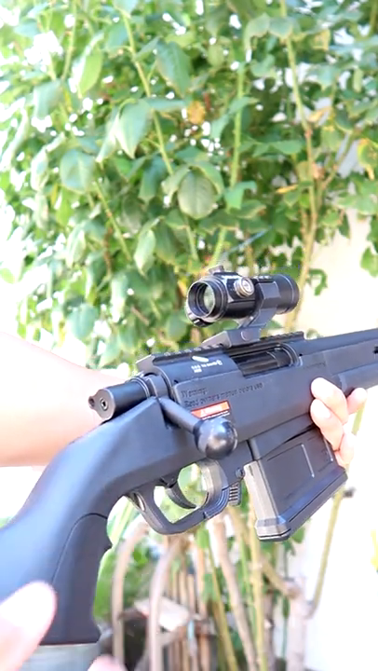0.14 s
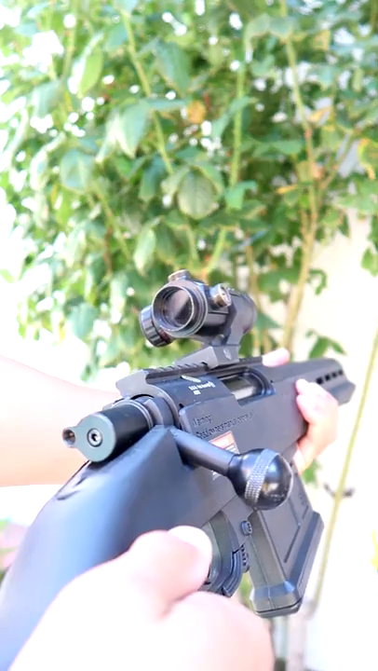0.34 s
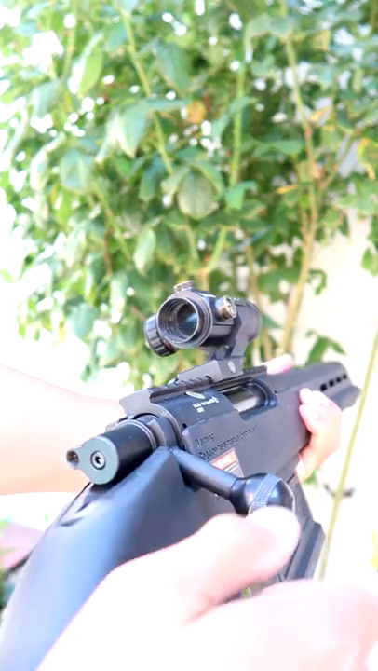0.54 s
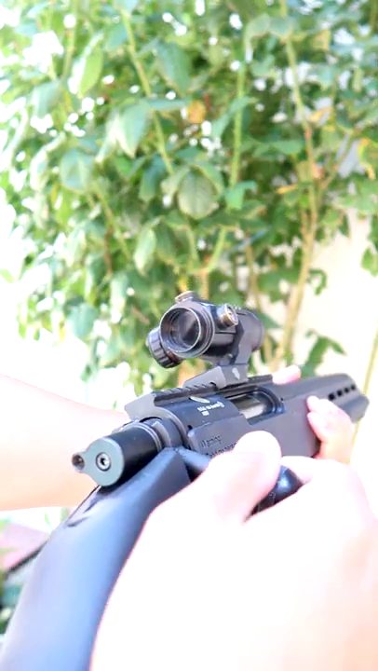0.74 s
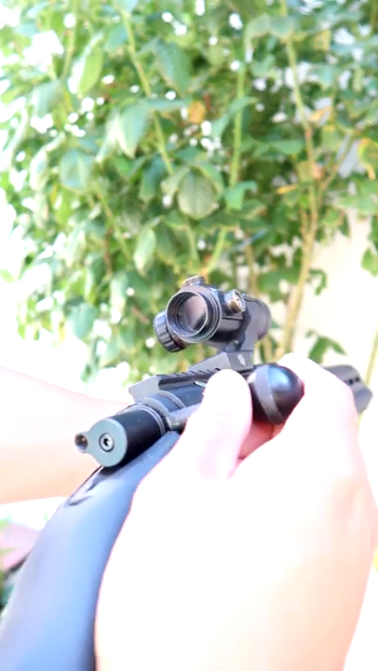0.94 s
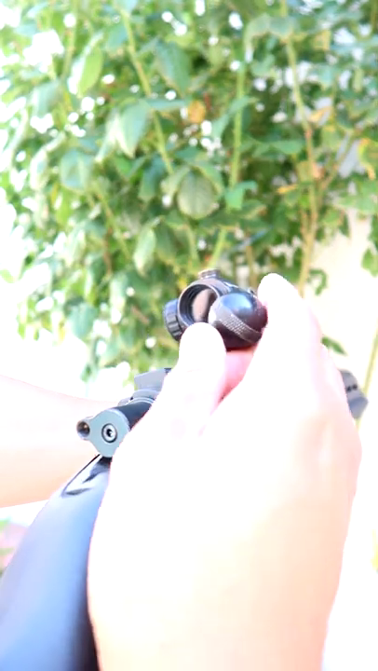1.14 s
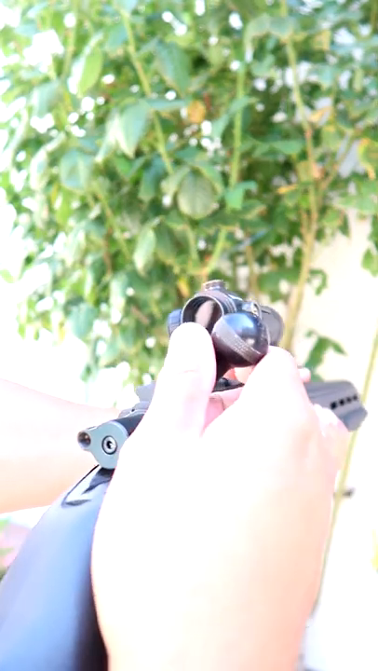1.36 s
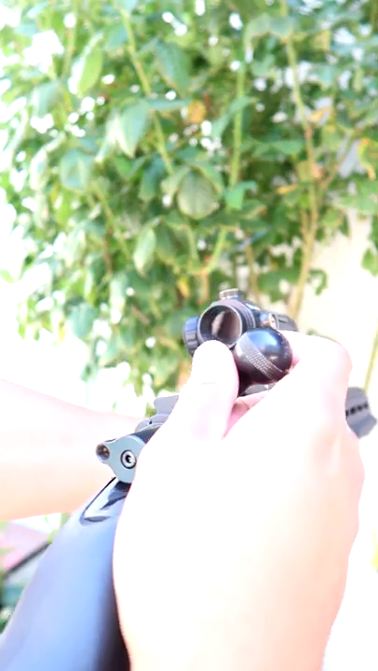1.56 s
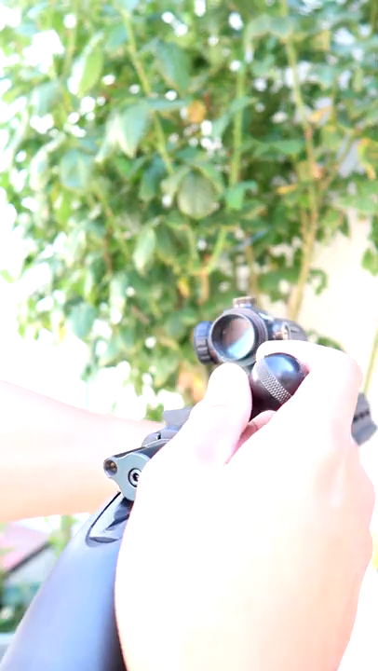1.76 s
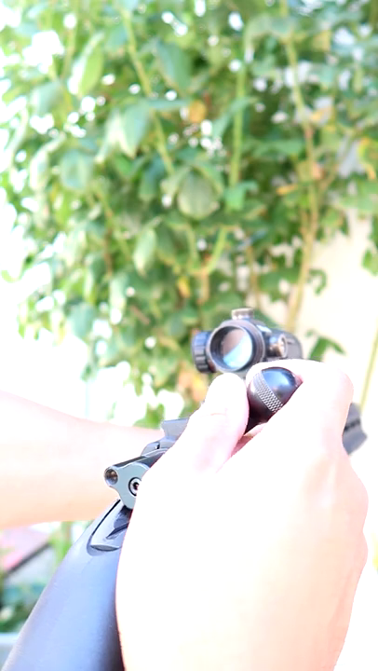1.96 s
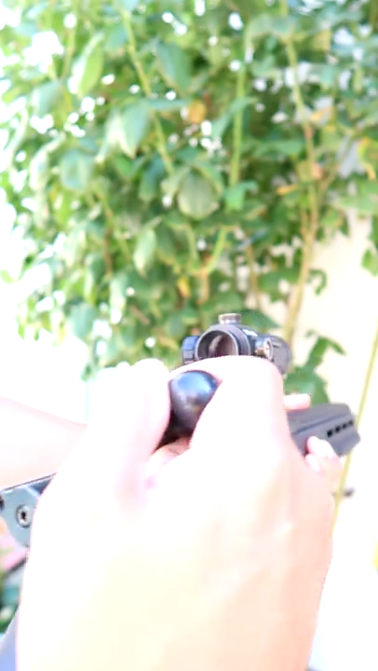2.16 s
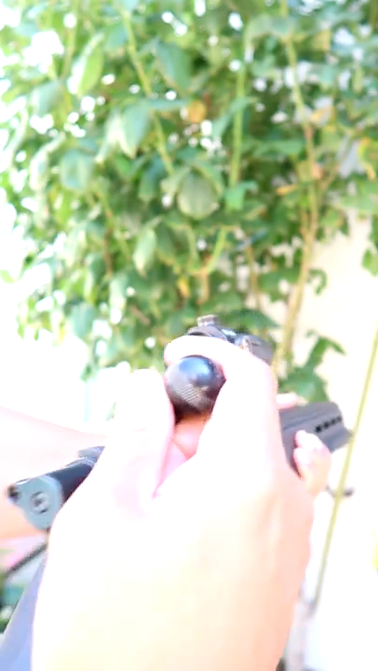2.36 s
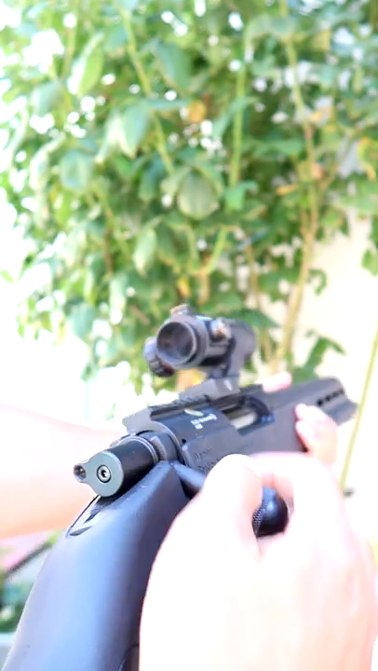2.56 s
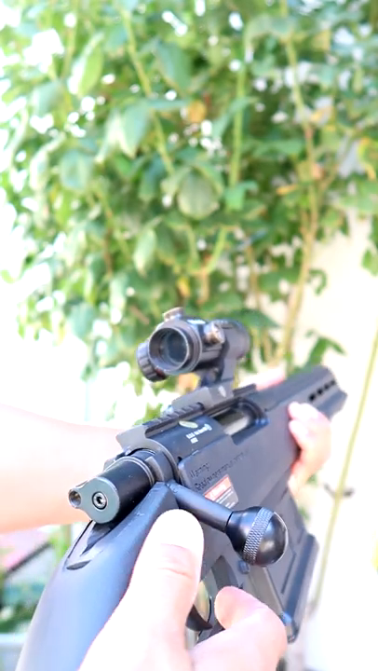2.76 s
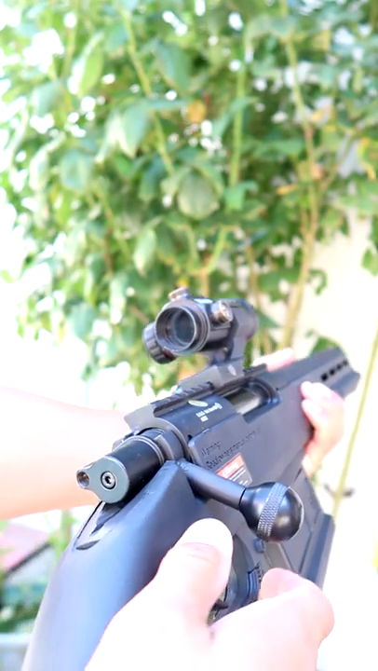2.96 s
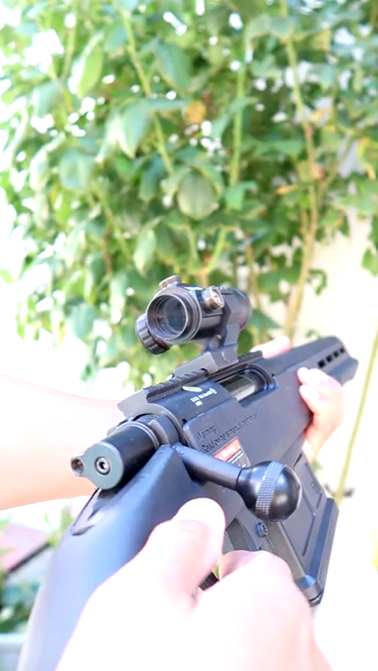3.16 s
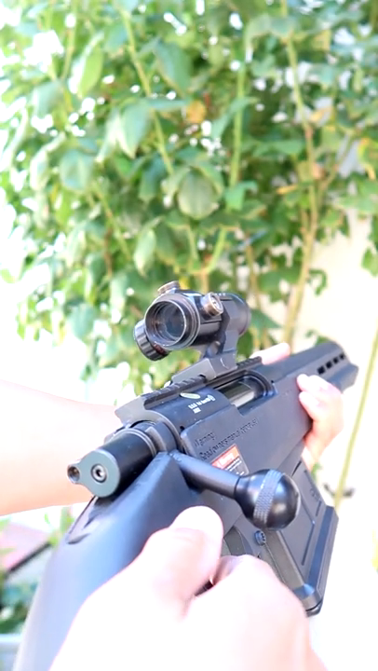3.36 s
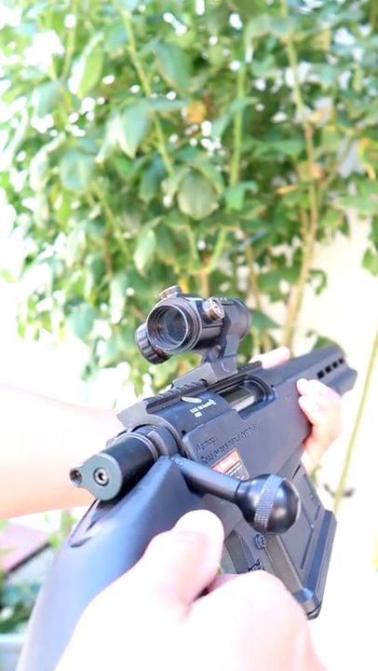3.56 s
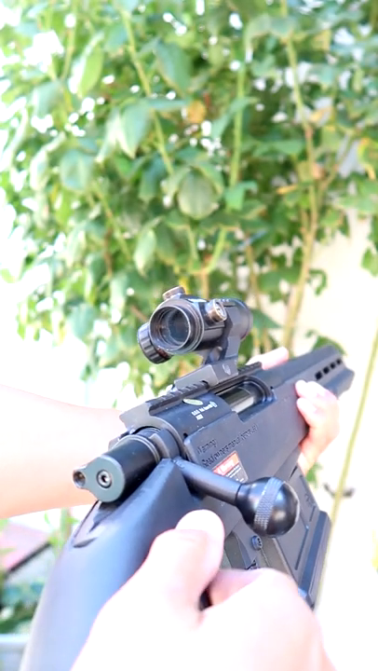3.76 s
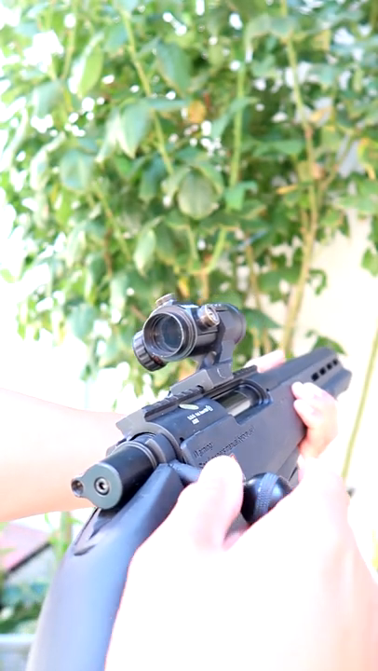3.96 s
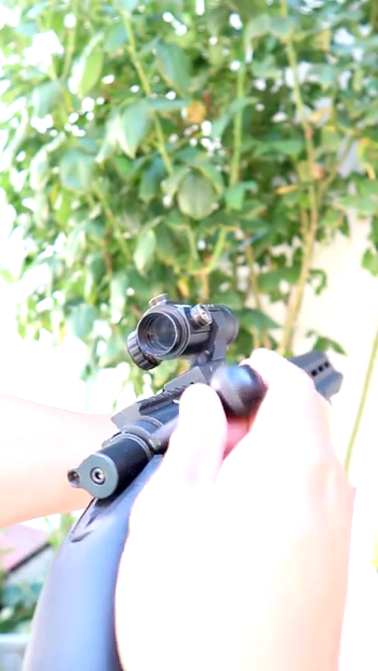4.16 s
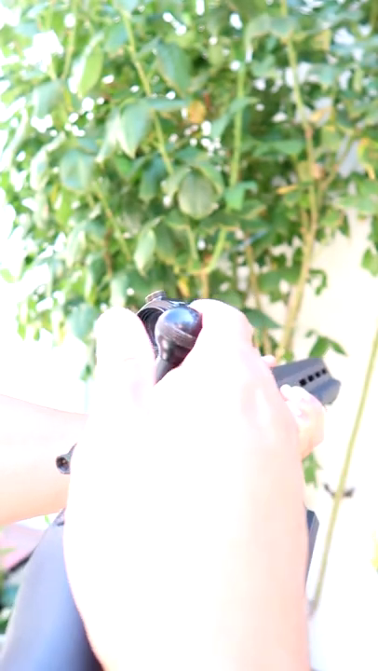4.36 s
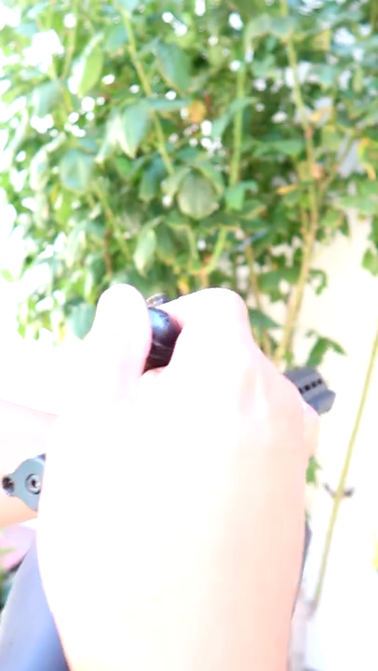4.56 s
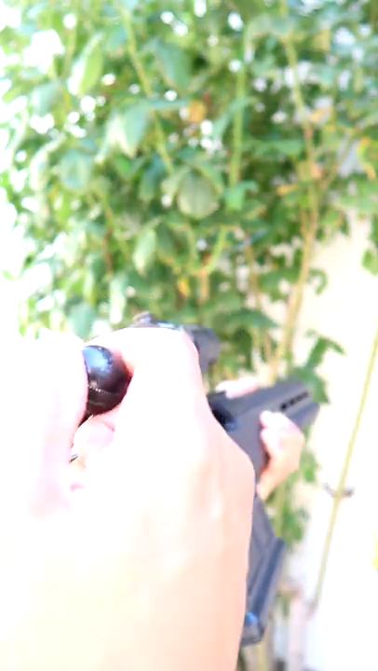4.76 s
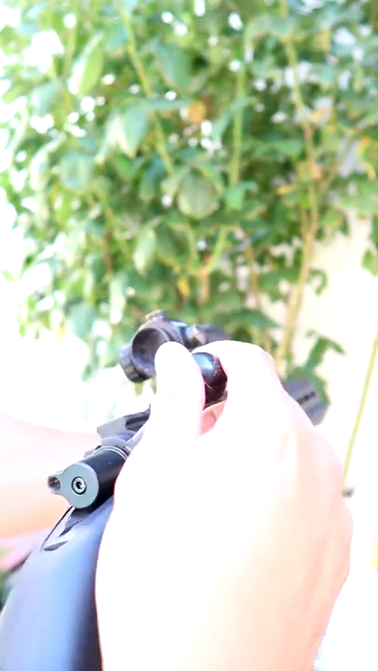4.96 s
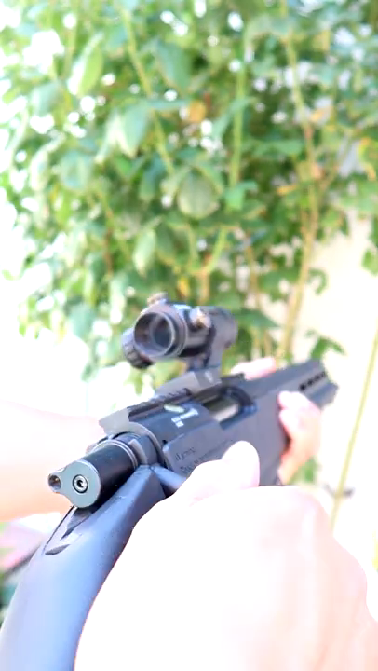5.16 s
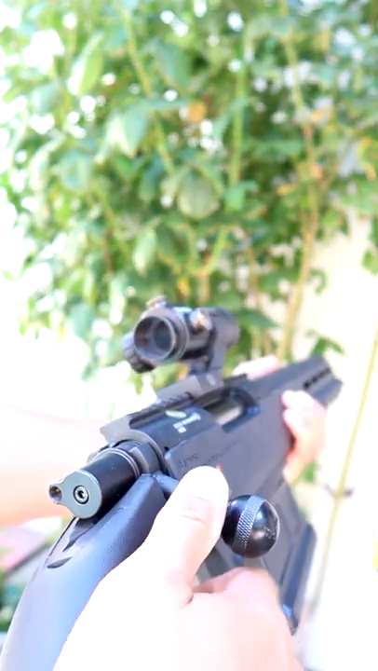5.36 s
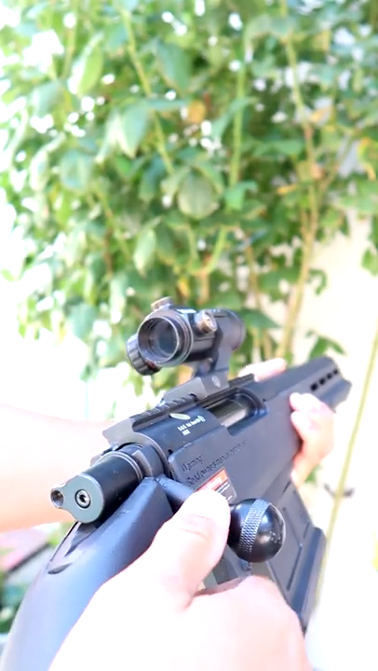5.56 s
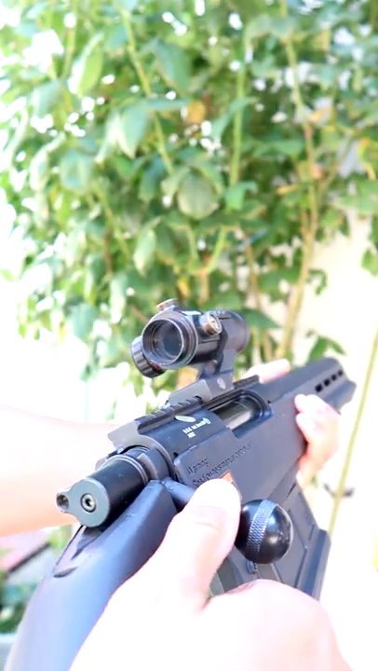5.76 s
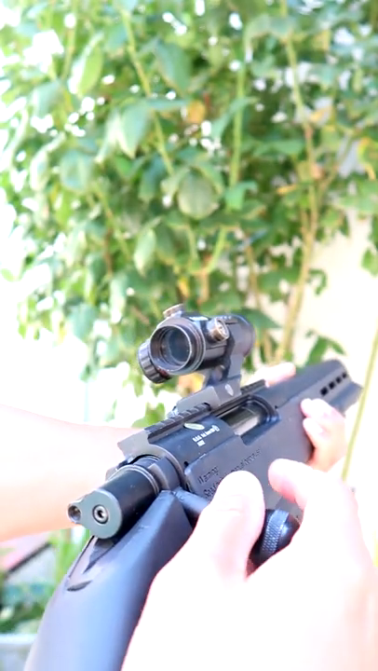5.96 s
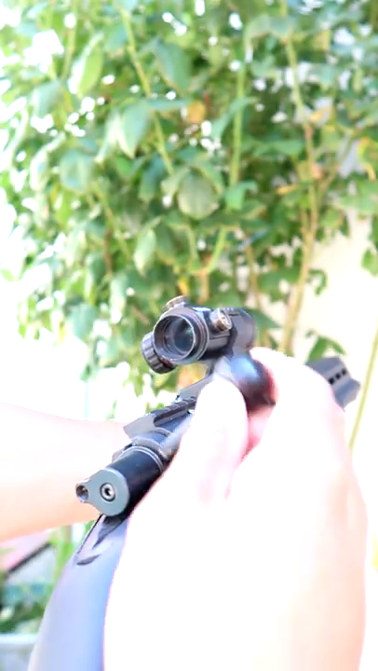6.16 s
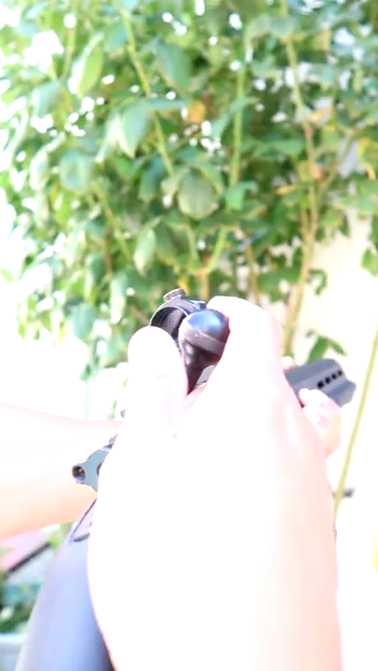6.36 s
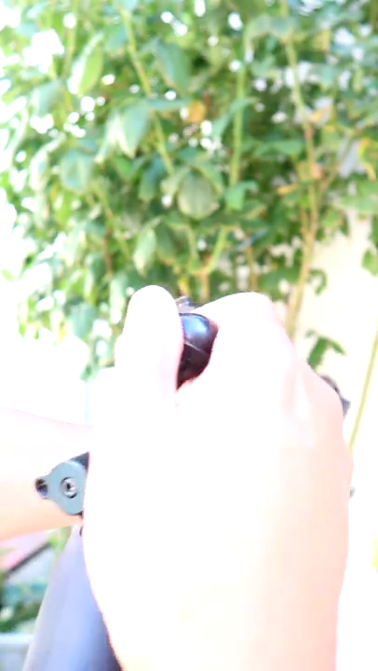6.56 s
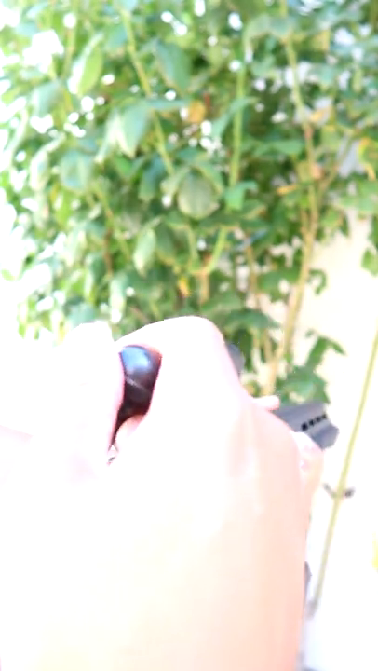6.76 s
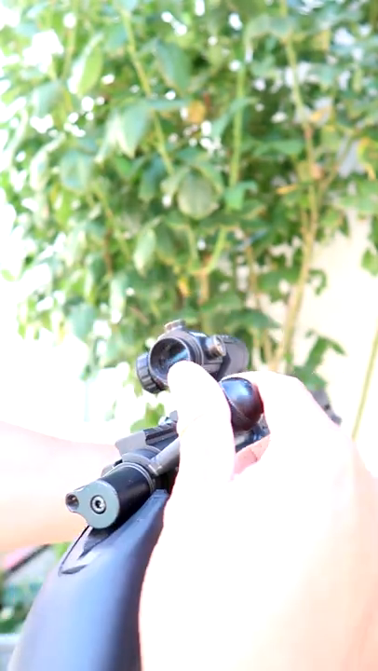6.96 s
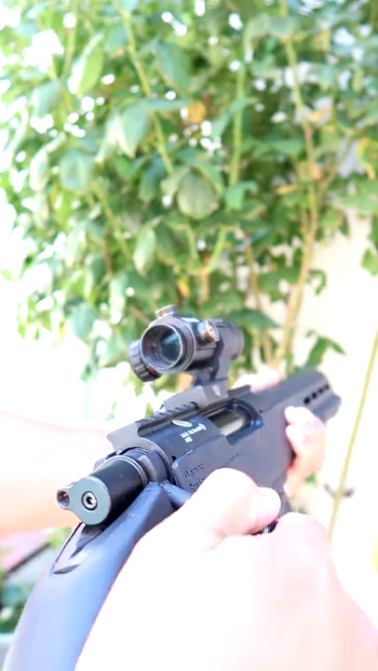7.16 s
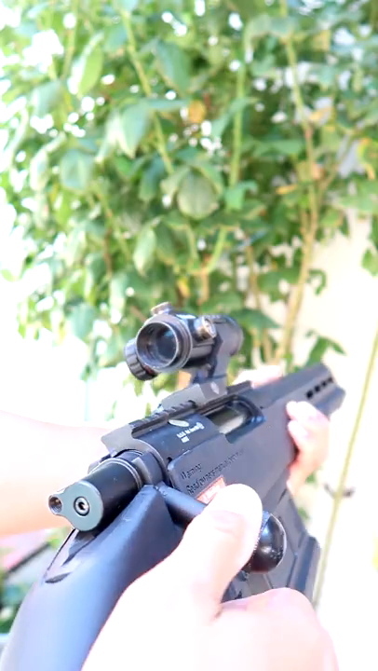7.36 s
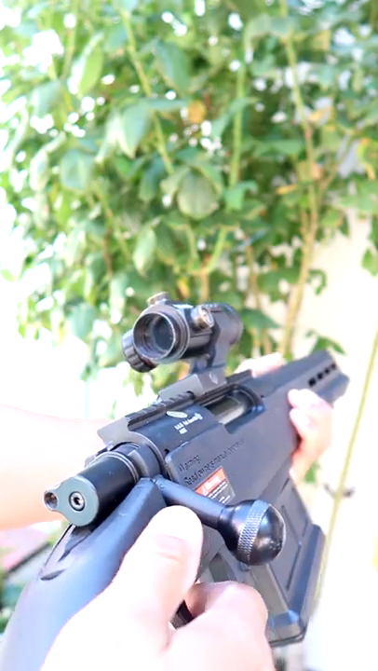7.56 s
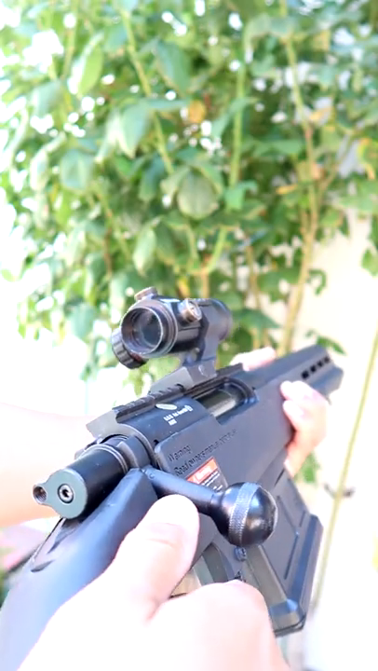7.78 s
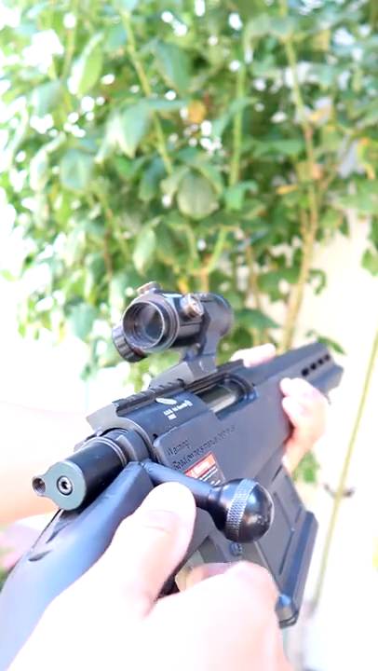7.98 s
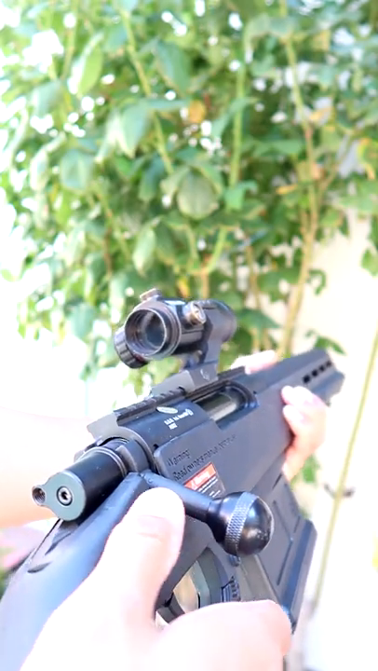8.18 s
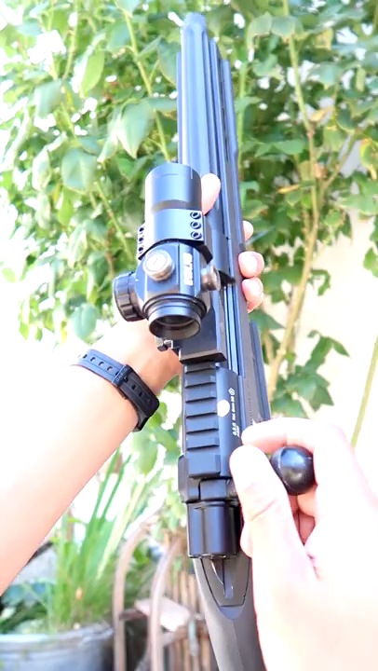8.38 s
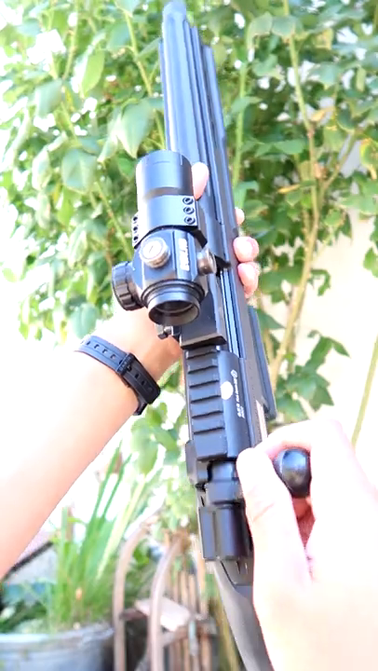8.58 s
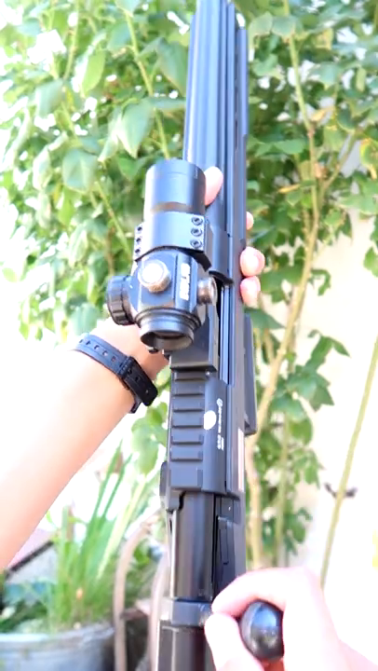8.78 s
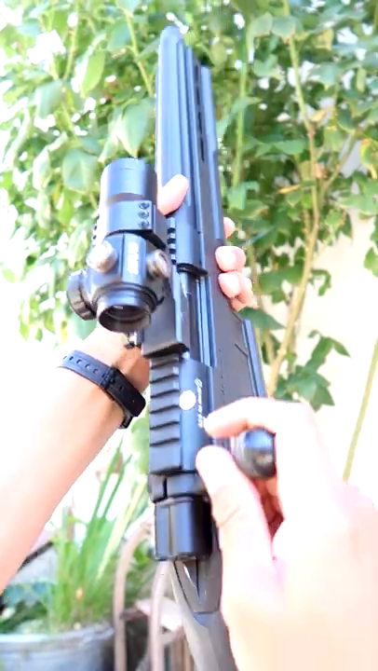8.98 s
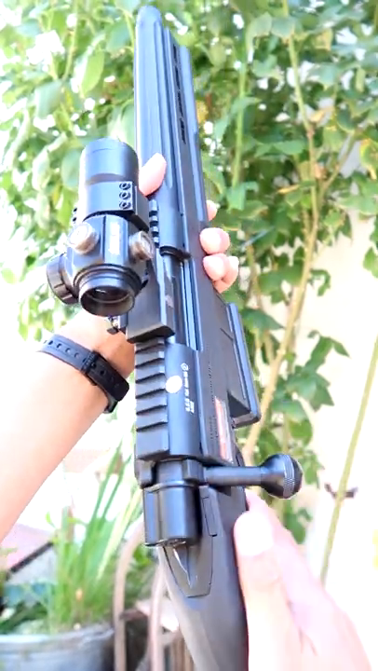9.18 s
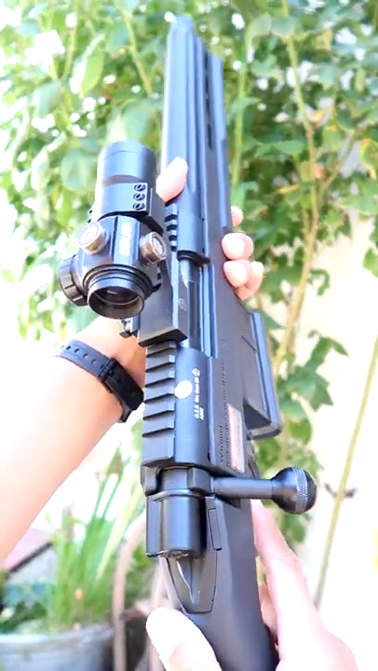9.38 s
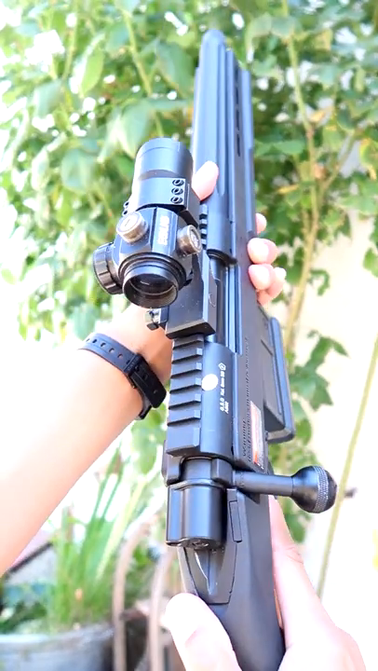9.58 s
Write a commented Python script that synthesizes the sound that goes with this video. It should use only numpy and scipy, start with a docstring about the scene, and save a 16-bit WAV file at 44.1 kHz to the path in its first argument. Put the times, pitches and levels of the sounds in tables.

```python
"""In a walled garden, a plastic spring rifle is cocked and fired close to a two-port microphone.
The palm rustles, the bolt rasps in its sleeve and clacks on its stops, and the piston slams home:
noise and short pushes ring the modes of the plastic body. Songbirds are gliding sines with echoes
from the walls; gusts, puffs and a faint outdoor hush are shaped bands of noise."""
import sys
import numpy as np
from scipy import signal
from scipy.io import wavfile
from scipy.ndimage import uniform_filter1d

SR = 44100
rng = np.random.default_rng(int(sys.argv[2]) if len(sys.argv) > 2 else 0)


def transcribe(u):
    """Save the signal u as a 16-bit wav file named by the first command-line argument.

    u: samples, shape (n,) or (channels, n), limited to [-1, 1]; the rate is SR.
    q: integer samples, one column per channel.
    """
    v = np.clip(np.atleast_2d(u).T, -1, 1)
    q = np.round(v * 32767).astype(np.int16)
    wavfile.write(sys.argv[1], SR, q)


N = 424683

# plastic hitting plastic:
# (time [s], blow level before offsets [dB], best-struck pitch [Hz], kind of contact sound)
BLOWS = [(0.7714, -23.5, 1770, "grip"), (1.1995, -8, 2600, "bump"), (2.0383, -20.5, 1490, "rattle"),
         (2.0551, -21.5, 1374, "grip"), (2.099, -15, 4000, "sear"), (2.1168, -6.5, 2110, "drag"),
         (2.2018, -1.5, 2300, "sear"), (2.2151, -6, 2500, "back stop"), (2.3833, -5.5, 2570, "push"),
         (2.418, -34, 1500, "rattle"), (2.4754, -12, 1100, "feed"), (2.4891, 1.5, 2060, "front stop"),
         (2.6392, -5.5, 1900, "lock"), (3.6819, -10, 2220, "trigger"), (3.691, 1.5, 2200, "piston"),
         (3.845, -35, 1500, "rattle"), (4.0414, -31, 1700, "grip"), (4.2974, -15, 2470, "lift"),
         (4.5739, -17, 1640, "drag"), (4.642, -28, 1100, "drag"), (4.668, -31, 1000, "grip"),
         (4.6957, -8.5, 3960, "sear"), (4.7222, -7, 2300, "back stop"), (4.8737, -4, 2520, "push"),
         (4.9577, -5.5, 2070, "feed"), (4.9684, 0, 2100, "front stop"), (5.1415, -9, 1580, "lock"),
         (5.656, -38, 2200, "grip"), (5.6981, -13.5, 2240, "trigger"), (5.707, 0.5, 2200, "piston"),
         (6.0586, -37, 2060, "grip"), (6.2669, -14, 2340, "lift"), (6.48, -40, 2000, "rattle"),
         (6.524, -37, 1100, "grip"), (6.5809, -23, 1090, "drag"), (6.6003, -10, 2040, "drag"),
         (6.6961, -12, 2800, "sear"), (6.7116, -6, 2600, "back stop"), (6.8695, -9, 2360, "push"),
         (6.978, -6, 1490, "feed"), (6.994, -1, 1970, "front stop"), (7.1565, -2.5, 1930, "lock"),
         (7.8528, -13, 2200, "trigger"), (7.862, 1.5, 2000, "piston"), (8.339, -33, 2700, "rattle"),
         (8.3727, -17, 2900, "feed"), (8.6727, -16, 1100, "feed"), (8.691, -21, 1100, "feed"),
         (8.7261, -6.5, 3970, "sear"), (8.736, -6, 2840, "back stop"), (8.8815, -5.5, 3500, "push"),
         (8.891, -16, 950, "feed"), (8.961, -10, 1150, "feed"), (8.9762, -6.5, 1080, "front stop"),
         (8.9913, -3, 1090, "front stop"), (9.1715, -13, 1100, "feed"), (9.1938, -19, 1220, "rattle"),
         (9.2723, -12.5, 2340, "rattle")]


def amp(db):
    """Turn decibels into a gain."""
    return np.exp(np.asarray(db) * np.log(10) / 20)


def rms_one(x):
    """Scale a sound to an rms of 1."""
    return x / np.sqrt(np.mean(x ** 2) + 1e-20)


def at_hz(points, hz):
    """Read a curve between its points, along a logarithmic frequency axis."""
    points_hz, values = np.transpose(points)
    return np.interp(np.log(hz), np.log(points_hz), values)


def level_db(spans):
    """Draw level curves over time, practically silent (-120 dB) between them."""
    levels, t = np.full(N, -120.), np.arange(N) / SR
    for rows in spans:
        times, db = np.transpose(rows)
        inside = (t >= times[0]) & (t <= times[-1])
        levels[inside] = np.interp(t[inside], times, db)
    return levels


def swells(rows, rise_s, fall_s, sag_db):
    """Level curves of events that rise from 22 dB down, sag while they last and fall again."""
    curves = []
    for start, length, db, *_ in rows:
        risen = start + min(rise_s, .45 * length)
        falling = start + length - min(fall_s, .45 * length)
        curves.append([(start, db - 22), (risen, db), (falling, db - sag_db), (start + length, db - 22)])
    return curves


def band(x, low_hz, high_hz):
    """Keep only the sound between two frequencies, with gentle slopes outside."""
    return signal.sosfilt(signal.butter(2, [low_hz, high_hz], "band", fs=SR, output="sos"), x)


def drift(rate_hz):
    """Slow random wandering of spread 1: smoothed noise, made every 40 samples and joined by lines."""
    r = np.exp(-80 * np.pi * rate_hz / SR)
    noise = rng.standard_normal(N // 40 + 2002)
    slow = signal.lfilter([1], [1, -2 * r, r * r], noise)[2000:]     # drop the filter's start-up
    return np.interp(np.arange(N) / 40, np.arange(len(slow)), rms_one(slow))


def ring(force, hz, t60):
    """A resonance: each unit click starts a sine of height 1 that falls 60 dB in t60 seconds."""
    r, w = amp(-60 / (t60 * SR)), 2 * np.pi * hz / SR
    return signal.lfilter([0, np.sin(w)], [1, -2 * r * np.cos(w), r * r], force + 1e-18)


def hush():
    """Far traffic and leaves: half-octave bands of noise that waver a little."""
    # colour of the hush before overall scaling: (frequency [Hz], relative level [dB per Hz])
    colour = [(25, 2.5), (489, 1), (2410, -13.5), (4250, -12), (5570, -19.5), (15500, -37)]
    # overall level: (time [s], level [dB])
    overall = [(0.0, -52), (9.63, -55)]
    # how alike the two ports are: (frequency [Hz], likeness [1 = same, 0 = unrelated])
    likeness = [(60, 0.98), (380, 1), (2380, 0.32), (15000, 0.12)]
    total, edges = 0, 22 * 2 ** np.arange(0, 9.6, .5)
    white = rng.standard_normal((2, 2, N))     # neighbouring bands use different noise
    for k, (low, high) in enumerate(zip(edges, edges[1:])):
        mid, side = band(white[k % 2], low, high)
        hz = np.sqrt(low * high)
        alike = np.clip(at_hz(likeness, hz), -1, 1)
        gain = amp(at_hz(colour, hz) + 2.5 * drift(6))
        ports = np.sqrt(1 + alike) * mid + np.sqrt(1 - alike) * side * [[1], [-1]]
        total = total + gain * ports
    return rms_one(total) * amp(level_db([overall]))


def birds():
    """Near-sine whistles glide with soft edges and slight flutter; the faintest come as echo alone."""
    # single notes; the last two columns only if the glide bends: (time [s], level [dB], length [s],
    # first pitch [Hz], last pitch [Hz], bend after [s], bend pitch [Hz])
    notes = [(.003, -59, .2, 2350, 2200), (.21, -57.5, .12, 4550, 4250), (.535, -55.5, .17, 2650, 3000),
             (.568, -46, .09, 6680, 6110, .035, 6830), (.625, -53, .07, 3450, 3500),
             (.71, -47.5, .058, 3570, 3150), (1.012, -56, .045, 4300, 3150, .014, 4950),
             (1.08, -53.5, .075, 3250, 3843, .018, 3774), (1.695, -32.5, .04, 6700, 6700, .022, 8020),
             (1.733, -32.5, .065, 6800, 7300, .017, 7350), (1.874, -37.5, .11, 4800, 4780),
             (2.062, -40.5, .12, 8650, 8060), (2.215, -34.5, .12, 6370, 5700, .03, 5850),
             (3.384, -35.5, .17, 8110, 7354, .03, 7665), (3.475, -44, .07, 5700, 5200),
             (3.605, -55, .05, 2700, 4000), (3.72, -44, .12, 6980, 6795), (4.475, -49, .085, 3350, 3550),
             (4.385, -33, .03, 6300, 8300, .015, 8250), (4.413, -35, .022, 8250, 7000),
             (4.624, -38, .06, 5800, 8600, .016, 8700), (4.768, -35, .032, 6070, 3960),
             (4.832, -36, .035, 6000, 8200, .015, 8100), (4.895, -44, .06, 7600, 7250, .015, 7350),
             (2.8, -60, .08, 2150, 2100), (5.49, -62, .12, 6650, 6500), (6.52, -57.5, .06, 8500, 8000),
             (8.4, -62, .1, 8200, 7800)]
    # notes repeated at an even pace: (first time [s], last time [s], one every [s], level [dB],
    # length [s], first pitch [Hz], last pitch [Hz], bend after [s], bend pitch [Hz])
    runs = [(.19, .33, .14, -58.5, .09, 7230, 6800), (.77, .85, .08, -51.5, .035, 5320, 6400),
            (.908, 1.312, .202, -50, .04, 6200, 6690, .014, 8153),
            (1.028, 1.43, .201, -42, .06, 6700, 4600), (1.512, 1.626, .038, -45, .025, 4260, 3770),
            (2.36, 3.258, .1495, -34.5, .068, 6000, 3800, .013, 6600),
            (3.71, 3.93, .22, -41.5, .09, 4660, 4520), (3.792, 4.3525, .0295, -41, .006, 7900, 5200),
            (4.062, 4.682, .155, -43.5, .098, 5600, 3240, .01, 6100), (5.2, 7.2, 1.0, -62, .1, 4340, 4310),
            (2.44, 3.26, .137, -57.5, .03, 6600, 7150), (2.99, 3.37, .38, -58, .08, 3420, 3280),
            (5.07, 7.07, .5, -61, .07, 3450, 3620)]
    far_db = -57     # notes at or below this level come from beyond the walls
    sung = list(notes)
    for first, last, every, *note in runs:
        count = round((last - first) / every) + 1
        sung += [(first + k * every, *note) for k in range(count)]
    out = np.zeros((2, N))     # row 0 is heard directly, row 1 feeds the garden echoes
    for at, db, length, first_hz, last_hz, *bend in sung:
        times, pitches = [0, *bend[:1], length], [first_hz, *bend[1:], last_hz]
        t = np.arange(int(length * SR)) / SR
        edge = np.clip(np.minimum(t, length - t) / min(.009, length / 2), 0, 1)
        glide = np.interp(t, times, pitches)
        rounded = uniform_filter1d(glide, len(t) // 6, mode="nearest")     # soften the bends
        tone = np.sqrt(2) * edge * np.sin(2 * np.pi * np.cumsum(rounded) / SR)
        start = round(at * SR)
        out[:, start:start + len(t)] += amp(db) * tone * [[db > far_db], [1]]
    return out * amp(3.0 * drift(70))


def garden(x, t60, dull):
    """Dense echoes from walls and leaves: fading noise, partly the same at both ports."""
    t = np.arange(SR) / SR
    fade = amp(-60 * t / t60) * (1 - np.exp(-t / .006))     # echoes build up, then die away
    shared, left, right = rng.standard_normal((3, SR)) * fade
    ports = np.array([shared + 0.21 * left, shared + 0.76 * right])
    tail = signal.lfilter([1], [1, -dull], ports)     # soften the treble
    tail /= np.sqrt(np.sum(tail[0] ** 2))
    return signal.fftconvolve(x[None], tail, axes=1)[:, :N]


def rifle():
    """A small hollow body radiates little bass; the left port hears it one sample sooner."""
    # ringing modes of stock and receiver: (frequency [Hz], relative level [dB])
    body = [(270, 0), (430, 10), (700, 10.5), (1080, 1.5), (1500, 1.5), (2150, 7.5), (2800, 8),
            (3700, 10.5), (5200, 7.5), (6800, 6.5), (9000, 8), (12500, -2.5)]
    hz, db = np.transpose(body)
    t60 = .0095 * (1500 / hz) ** .68     # ringing time in seconds: plastic damps high modes faster
    out = rustle() + clacks(hz, db, t60) + rasps(hz, db, t60) + spring()
    out = signal.sosfilt(signal.butter(3, 215, "high", fs=SR, output="sos"), out)
    return np.array([np.r_[out[1:], 0] * amp(0.73), out])


def rustle():
    """Skin on plastic: soft noise, with a brighter swish when the palm moves fast."""
    # palm sliding over the stock: (time [s], dull level [dB], bright level [dB])
    strokes = [(.205, -48.5, -59), (.45, -55.5, -76), (.5, -45.5, -54), (0.609, -47, -52), (.7, -60, -79)]
    rows = np.array(strokes)
    noise = rng.standard_normal((2, N)) * amp(2.0 * drift(25))
    dull = rms_one(band(noise[0], 250, 2800)) * amp(level_db([rows[:, [0, 1]]]))
    bright = rms_one(band(noise[1], 2500, 9500)) * amp(level_db([rows[:, [0, 2]]]))
    return dull + bright


def clacks(hz, db, t60):
    """Short chatters of force strike the body modes, each detuned a little at random per blow."""
    # kinds of contact sound, named after a typical part; a name may serve similar knocks:
    # (boom level before offsets [dB], snap level before offsets [dB], contact chatter [ms])
    contacts = {"bump": (5, -4, 4.2), "grip": (4, -4, 1.4), "lift": (-6, 4, 2.8), "drag": (-2, -3, 1.8),
                "sear": (-13, 1.5, 1.6), "back stop": (-5, -1.5, 2.4), "push": (-14, 1.5, 0.6),
                "feed": (-8, -1.5, 2.1), "front stop": (-9, 5.5, 2.2), "lock": (1, 5, 1.2),
                "rattle": (-12, -4, 0.9), "trigger": (-5, 0.5, 3.0), "piston": (3, 6.5, 1.9)}
    shell_hz, tube_hz = 430, 570     # the hollow stock booms; the piston knocks its tube
    rebound_s, rebound_db, rebound_hz = .0065, -4, 2900     # the bolt bounces once off its back stop
    blows = list(BLOWS)
    for at, peak_db, _, kind in BLOWS:
        if kind == "back stop":
            blows.append((at + rebound_s, peak_db + rebound_db, rebound_hz, kind))

    t = np.arange(4000) / SR
    late = t - .0075     # time from the blow
    ring_t = t[:1600]
    hz, db, t60 = np.repeat([hz, db, t60], 6, axis=1)     # every mode is a cluster of six
    layer_modes = np.array([hz < 900, (hz > 900) & (hz < 4500), hz > 4500])     # boom, clack, snap
    decays = amp(-60 * ring_t / t60[:, None])
    noise = rng.standard_normal((len(blows), len(t)))
    luck = rng.standard_normal((len(blows), 2, len(hz)))
    out = np.zeros(N)
    for (at, peak_db, struck_hz, kind), grain, (detune, favour) in zip(blows, noise, luck):
        boom_db, bright_db, chatter_ms = contacts[kind]
        fall = chatter_ms / 1000
        # force swells very briefly before the blow, then chatters
        before = np.exp(late / (.2 * fall)) + amp(-18) * np.exp(late / (2.6 * fall))
        force = grain * np.where(late < 0, before, np.exp(-late / fall))
        force[np.argmin(np.abs(late))] += 2.0     # the blow itself is one hard push
        # loose parts rattle on, all over the body
        loose = amp(-24) * grain[::-1] * (late > 0) * np.exp(-late / (7.5 * fall))

        moved = hz * np.exp(.09 * detune)
        rings = decays * np.sin(2 * np.pi * ring_t * moved[:, None])
        boom_hz = tube_hz if kind == "piston" else shell_hz
        centre = np.where(layer_modes[0], boom_hz, struck_hz)
        # boom modes near the boom pitch and clack modes near the struck pitch speak loudest
        near_db = -16.0 * np.abs(np.log2(moved / centre)) * ~layer_modes[2]
        drive = (layer_modes * amp(db + near_db + 2 * favour)) @ rings
        loose_drive = (layer_modes * amp(db + near_db / 4)) @ rings
        layers = signal.fftconvolve(force[None], drive, axes=1)[:, :len(t)]
        layers += signal.fftconvolve(loose[None], loose_drive, axes=1)[:, :len(t)]
        no_bass = signal.butter(2, .6 * struck_hz, "high", fs=SR, output="sos")
        layers[1:] = signal.sosfilt(no_bass, layers[1:])     # a small contact has no bass
        layers /= np.max(np.abs(layers), axis=1, keepdims=True)

        start = round((at - .007) * SR)
        snap_db = bright_db - 7.5 + 0.63 * peak_db     # harder blows are brighter
        mix_db = peak_db + 3.0 + np.array([boom_db - 5.0, 0, snap_db])
        out[start:start + len(t)] += amp(mix_db) @ layers
    return out


def wind():
    """Eddies thump the ports in the bass; stronger gusts add a flutter that each port has alone."""
    # two long gusts, each a list of (time [s], level [dB])
    gusts = [
        [(1.17, -53), (1.2, -21), (1.28, -19), (1.36, -21.5), (1.42, -38), (1.46, -37), (1.55, -24.5),
         (1.62, -28), (1.65, -49)],
        [(7.655, -55), (7.68, -34), (8.05, -32), (8.19, -25), (8.24, -30), (8.29, -17.5), (8.315, -24),
         (8.33, -53)],
    ]
    # short puffs on the ports: (start [s], length [s], level [dB])
    puffs = [(1.69, .06, -38), (1.77, .09, -41), (1.96, .08, -41), (5.84, .13, -36)]
    gust_db = level_db(gusts + swells(puffs, rise_s=.022, fall_s=.035, sag_db=1.5))
    lumps = amp(3.8 * drift(45))     # uneven strength
    thump = rms_one(band(band(rng.standard_normal(N) * lumps, 80, 300), 45, 500))     # shared
    own = rms_one(band(band(rng.standard_normal((2, N)) * lumps, 180, 520), 160, 400))     # per port
    flutter = rng.standard_normal((2, N)) * lumps ** 1.5
    flutter = rms_one(band(band(flutter, 450, 1100), 400, 1800))
    bass = amp(gust_db) * (thump * amp([[-.6], [.6]]) + amp(-3) * own)
    flutter_db = 2.6 * (gust_db + 28) - 54     # grows faster than the gust
    return bass + amp(flutter_db) * flutter


def rasps(hz, db, t60):
    """Dense grit rings the hand-damped modes; the contact travels, so the best-rubbed pitch moves."""
    # bolt sliding back and forth in its sleeve:
    # (start [s], length [s], level [dB], first rubbed pitch [Hz], last rubbed pitch [Hz])
    slides = [(2.06, .14, -32, 3500, 1500), (4.545, .1, -33, 3600, 1100), (4.885, .07, -39, 2400, 2500),
              (6.555, .14, -35, 3500, 1300), (6.925, .053, -37, 2200, 2400),
              (8.63, .097, -26.5, 2800, 4200), (8.885, .075, -42, 2600, 3200)]
    grains_per_s, boom_db, snap_db, focus_db_per_octave = 2400, -11, -13, 14.0
    hits = rng.random(N) < grains_per_s / SR
    strength = amp(3.8 * np.minimum(rng.exponential(1, N), 4))
    grit = hits * strength * rng.choice([-1, 1], N)
    grit = grit * amp(3.6 * drift(50))     # the slide catches and lets go
    hz, db, t60 = np.repeat([hz, db, t60], 5, axis=1)     # every mode is a cluster of five
    db = db + boom_db * (hz < 900) + snap_db * (hz > 4500)
    middle = (hz > 900) & (hz < 4500)     # only these modes follow the rubbed pitch
    detunes = rng.standard_normal((len(slides), len(hz)))
    out = np.zeros(N)
    for (start, length, _, first_hz, last_hz), detune in zip(slides, detunes):
        part = slice(round(start * SR), round((start + length) * SR))
        rubbed = np.geomspace(first_hz, last_hz, part.stop - part.start)
        moved = hz * np.exp(.12 * detune)
        octaves_off = np.abs(np.log2(moved[:, None] / rubbed)) * middle[:, None]
        rings = [(-1) ** k * ring(grit[part], moved[k], .9 * t60[k]) for k in range(len(hz))]
        gains = amp(db[:, None] - focus_db_per_octave * octaves_off)
        out[part] = rms_one(np.sum(rings * gains, axis=0))
    return out * amp(level_db(swells(slides, rise_s=.028, fall_s=.006, sag_db=6.0)))


def spring():
    """After each back stop the cocked spring shivers: a narrow, rough ring dies away."""
    below_blow_db, fade_s = -31, .05
    t, shake = np.arange(N) / SR, 0
    for at, peak_db, _, kind in BLOWS:
        if kind == "back stop":
            fade = np.exp(-np.abs(t - at) / fade_s)
            shake = shake + (t > at) * amp(peak_db + below_blow_db) * fade
    return shake * rms_one(ring(rng.standard_normal(N), hz=2750, t60=.008))


def scene():
    """Rifle near, birds far: near walls answer the rifle briefly, the whole garden answers the birds."""
    near, (direct, far) = rifle(), birds()
    rifle_echo = amp(-28.5) * garden(near[0], t60=.35, dull=.55)
    bird_echo = amp(-2) * garden(far, t60=0.56, dull=.4)
    bird_ports = direct * amp([[.6], [-.6]])     # slightly to the left
    return near + bird_ports + rifle_echo + bird_echo + wind() + hush()


def record(dry):
    """The loudest slams overload and are rounded off; the top is cut, 50 dB down from 16.2 kHz up."""
    clipped = np.tanh((np.abs(dry) / .98) ** 3) ** (1 / 3) * .98 * np.sign(dry)
    return signal.sosfilt(signal.cheby2(16, 50, 16200, fs=SR, output="sos"), clipped)


dry = scene()
out = record(dry)
transcribe(out)
```